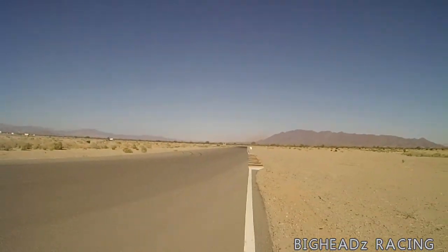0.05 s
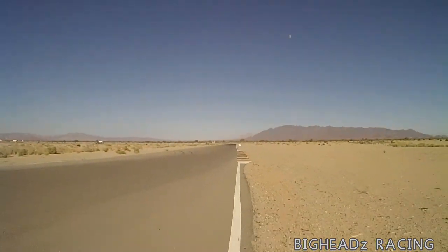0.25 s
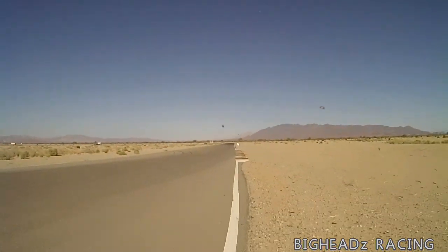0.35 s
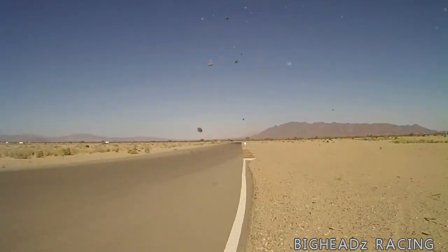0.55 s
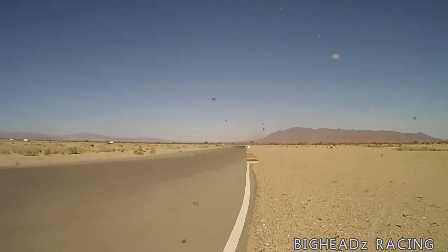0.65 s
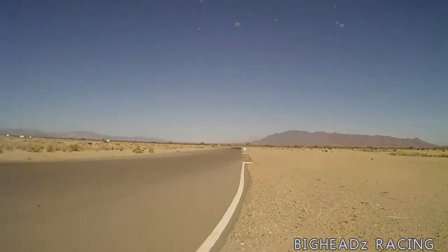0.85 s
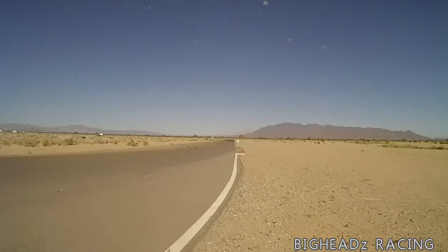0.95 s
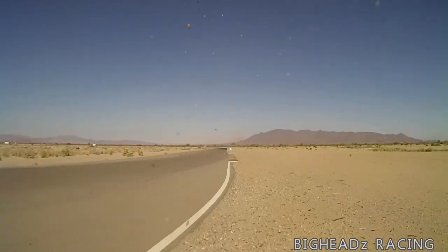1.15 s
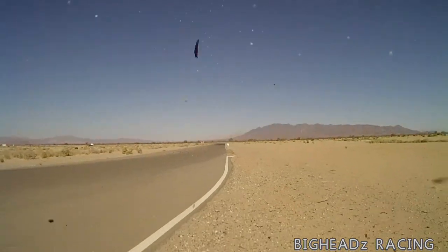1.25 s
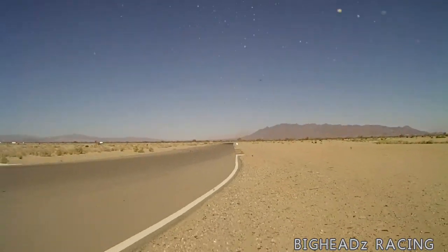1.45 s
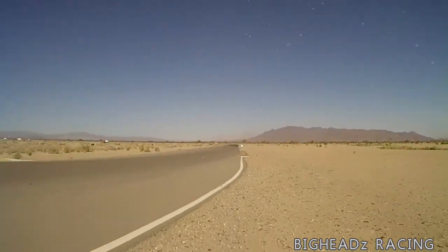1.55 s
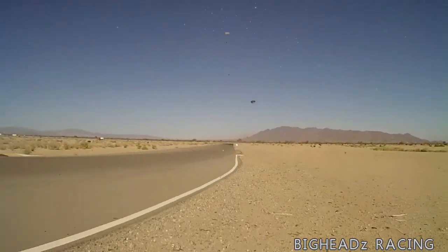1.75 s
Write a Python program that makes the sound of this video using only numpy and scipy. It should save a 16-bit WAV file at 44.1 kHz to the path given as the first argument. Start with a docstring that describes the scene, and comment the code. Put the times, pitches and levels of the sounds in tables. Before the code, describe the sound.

Gravel ticking and cracking against a moving car over wind and road rush.

```python
"""Gravel edge of a desert track, heard from a small camera case on the body of a moving car.
A tyre flings sprays of grit at the bodywork in quick, uneven bursts, about twenty a second.
Sand and pebbles tick on the case, which rings near 2.6 kHz; a few stones hit hard enough to overload.
Below lie wind, road rush, a faint engine and two dull road bumps."""
import sys
import numpy as np
from scipy import signal
from scipy.fft import rfft, irfft
from scipy.io import wavfile
from scipy.ndimage import uniform_filter1d

SR = 44100
rng = np.random.default_rng(int(sys.argv[2]) if len(sys.argv) > 2 else 0)


def wav_out(sig):
    """Save sig, one row per channel (or a flat mono array), as 16-bit PCM at SR to the path in sys.argv[1]."""
    wavfile.write(sys.argv[1], SR, np.round(np.clip(np.atleast_2d(sig).T, -1, 1) * 32767).astype(np.int16))


N = 79380
T = np.arange(N) / SR

# wind and road rush (frequency [Hz], gain [dB])
RUSH_COLOUR = [(20, 0), (80, 1), (150, 3), (300, -3), (550, -8), (1000, -7.5), (1750, -10), (2200, 1.5),
               (2420, -4), (2690, 1), (3000, -5), (4000, -14.5), (6200, -21.5), (7400, -26), (8400, -35),
               (10000, -46)]
# rush (time [s], level [dB])
RUSH_LEVELS = [(0, -34.5), (.45, -32), (.9, -31), (1.3, -31.3), (1.8, -34)]
# wind buffeting the case (frequency [Hz], gain [dB])
BUFFETING_COLOUR = [(5, -10), (13, 0), (32, -4), (60, -18), (150, -40), (2000, -100)]
# buffeting (time [s], level [dB])
BUFFETING_LEVELS = [(0, -35), (.12, -35), (.16, -31), (.22, -37), (.35, -38), (.55, -31), (.615, -21),
                    (.68, -38), (1.0, -35), (1.45, -36), (1.8, -41)]
# engine drone (frequency [Hz], start level [dB], end level [dB])
ENGINE_TONES = [(155, -56, -45.5), (208, -46, -49), (343, -51, -56), (785, -52, -57)]
# grit on the bodywork (time [s], relative level [dB], T60 [s], treble offset [dB])
GRIT_SPRAYS = [(.070, -31, .2, -3), (.127, -13.5, .095, -3), (.206, -16, .11, -2), (.278, -14.5, .1, -3),
               (.367, -15.5, .15, 0), (.411, -14, .11, 0), (.492, -12, .1, -2), (.508, -14, .13, 0),
               (.524, -17, .12, 0), (.557, -10.5, .135, -4), (.617, -21, .18, -1), (.664, -22, .13, 2),
               (.718, -20, .08, 0), (.727, -18, .16, 1), (.790, -12.5, .11, -1), (.851, -13, .13, -2),
               (.901, -15.5, .15, -2), (.957, -15, .11, -4), (.980, -24, .13, 0), (1.050, -16.5, .12, -4),
               (1.071, -17, .13, -1), (1.095, -6.5, .12, -5), (1.118, -19, .15, 1), (1.149, -16, .15, 0),
               (1.167, -11, .13, 0), (1.218, -8, .115, -2), (1.245, -18, .1, 2), (1.297, -20, .15, -1),
               (1.344, -17.5, .13, 0), (1.358, -20, .15, 0), (1.397, -22.5, .2, -1), (1.463, -18, .15, 0),
               (1.480, -19, .13, 0), (1.529, -18, .17, -2), (1.575, -28, .23, -1), (1.700, -21, .11, 2.5)]
# bodywork response (frequency [Hz], gain [dB])
BODY_COLOUR = [(150, -23), (350, -15), (600, -15), (1000, -6), (1250, -7), (1600, -3), (1820, -7),
               (2100, -1.5), (3200, -6), (3900, -13), (4300, -9.5), (4900, -16), (6200, -15.5), (7400, -18),
               (9500, -42), (14000, -43)]
# case resonances (frequency [Hz], bandwidth [Hz], gain [dB])
CASE_MODES = [(2220, 200, -9), (2540, 130, -.5), (2730, 110, .5), (3140, 200, -9.5)]
# sand on the case (time [s], relative level [dB])
SAND_LEVELS = [(0, -62), (.3, -54), (.38, -36), (.56, -37), (.66, -30), (.81, -30), (.9, -36), (1.2, -32.5),
               (1.5, -34.5), (1.72, -33)]
# crack of a hit (frequency [Hz], gain [dB])
CRACK_COLOUR = [(400, -26), (1500, -17), (3000, -4), (4200, -2), (4900, -5), (6100, 2), (6750, -4),
                (7450, 3.5), (8200, -11), (8700, -13), (10000, -30)]
# sparkle above the crack (frequency [Hz], gain [dB])
SPARKLE_COLOUR = [(6000, -30), (9800, -9), (11700, 2), (14600, 0), (17000, -14)]
# road bumps (time [s], level [dB], low edge [Hz], high edge [Hz])
ROAD_BUMPS = [(.160, -24, 25, 330), (.852, -28, 150, 260)]
# pebbles on the case, relative levels (time [s], crack [dB], ring [dB], sparkle [dB])
PEBBLE_HITS = [(0.195, -16, -21, -29), (0.2495, -24, -18, -35), (0.2535, -26, -19, -38),
               (0.3185, -39, -22, -66), (0.342, -13, -8, -28), (0.3455, -17, -8, -43),
               (0.3625, -32, -23, -55), (0.3693, -33, -19, -48), (0.372, -31, -24, -37),
               (0.376, -32, -11, -48), (0.3954, -40, -28, -42), (0.416, -27, -20, -43),
               (0.4645, -33, -28, -43), (0.4965, -25, -13, -40), (0.5125, -25, -10, -46),
               (0.533, -25, -23, -33), (0.552, -25, -15, -43), (0.6235, -28, -16, -64),
               (0.637, -29, -25, -35), (0.642, -26, -22, -36), (0.683, -27, -25, -44),
               (0.692, -22, -20, -43), (0.7345, -27, -20, -41), (0.749, -26, -19, -39),
               (0.7605, -38, -16, -59), (0.8138, -21, -30, -30), (0.8245, -39, -15, -37),
               (0.846, -28, -13.5, -52), (0.878, -33, -28, -44), (1.012, -25, -17.5, -40),
               (1.0705, -19, -18, -32), (1.086, -26, -24, -34), (1.149, -19, -15, -38),
               (1.165, -18, -19, -34), (1.176, -22, -10, -35), (1.187, -29, -26, -43),
               (1.2515, -19, -18, -28), (1.258, -12, -10, -26), (1.341, -28, -26, -41),
               (1.407, -26, -26, -44), (1.4355, -36, -34, -47), (1.462, -21, -20, -38),
               (1.484, -20, -17, -27), (1.538, -36, -19, -57), (1.5455, -34, -26, -43),
               (1.622, -23, -22, -42), (1.654, -31, -31, -48), (1.683, -30, -21, -49),
               (1.765, -35, -42, -49)]
# stones square on the case
# (time [s], ring pitch [Hz], ring [dB], ring T60 [s], crack peak [Hz], crack [dB], thud [dB])
STONE_HITS = [(.405, 2660, 0, .025, 5000, 3, -24), (.488, 2620, -3, .018, 7500, -5, -42),
              (.4922, 2590, 2, .012, 7600, -2, -40), (.5573, 2700, -3, .027, 7000, -10, -46),
              (1.0437, 2600, 8, .012, 5600, 5, -3), (1.0475, 2560, 6, .008, 7400, -3, -14),
              (1.095, 2480, -7, .02, 5700, -13, -40), (1.1, 2420, -5, .025, 6000, -18, -45)]

CASE_CENTRE_HZ, CRACK_PEAK_HZ = 2640, 7450
CRACK_T60_S, SPARKLE_T60_S = .015, .009


def from_db(db):
    """Decibels to gain."""
    return 10 ** (np.asarray(db) / 20)


def unit_rms(x):
    """Scale to unit rms."""
    return x / np.sqrt(np.mean(x ** 2) + 1e-20)


def gain_curve(points):
    """Gain through (time [s], level [dB]) points."""
    return from_db(np.interp(T, *np.transpose(points)))


def butter(x, hz, kind="low"):
    """Second-order Butterworth filter."""
    return signal.sosfilt(signal.butter(2, hz, kind, fs=SR, output="sos"), x)


def coloured(x, points, size=16384):
    """Minimum-phase filter through (frequency [Hz], gain [dB]) points, scaled to unit power gain."""
    hz, db = np.transpose(points)
    bins_hz = np.arange(size // 2 + 1) * SR / size
    log_gain = np.log(from_db(np.interp(np.log(bins_hz + 1), np.log(hz), db)))
    cepstrum = irfft(log_gain)[:size // 2]
    response = irfft(np.exp(rfft(2 * cepstrum, size)))
    return signal.fftconvolve(x, response / np.linalg.norm(response))[:len(x)]


def drift(cutoff_hz):
    """Random wander, unit rms."""
    return unit_rms(butter(rng.standard_normal(N + SR), cutoff_hz)[SR:])


def grains(per_s, spread_db):
    """Random contacts, most small, a few large."""
    sizes = from_db(spread_db * np.minimum(rng.exponential(1, N), 4)) * rng.choice([-1, 1], N)
    return unit_rms(sizes * (rng.random(N) < per_s / SR))


def contact(t60_s, strike=7, size=4096):
    """One sharp strike, then a dense, dying rattle."""
    rattle = rng.standard_normal(size) * from_db(-60 * T[:size] / t60_s)
    rattle[0] = strike
    return rattle


def add_hit(out, time_s, db, hit, window=132):
    """Mix in a hit with its loudest 3 ms at db."""
    start = int(time_s * SR)
    part = out[start:start + len(hit)]
    peak_rms = np.sqrt(uniform_filter1d(hit ** 2, window).max())
    part += from_db(db) * hit[:len(part)] / peak_rms


def wind():
    """Steady rush of air and road over slow buffeting."""
    rush = coloured(rng.standard_normal(N), RUSH_COLOUR)
    buffeting = unit_rms(coloured(rng.standard_normal(N), BUFFETING_COLOUR))
    return gain_curve(RUSH_LEVELS) * rush + gain_curve(BUFFETING_LEVELS) * buffeting


def engine(waver=.035, waver_hz=8, flutter_db=3.5, flutter_hz=9):
    """Tones waver together about a steady engine speed; each flutters in level."""
    warped_s = np.cumsum(1 + waver * drift(waver_hz)) / SR
    out = np.zeros(N)
    for hz, start_db, end_db in ENGINE_TONES:
        rms = from_db(np.linspace(start_db, end_db, N) + flutter_db * drift(flutter_hz))
        out += np.sqrt(2) * rms * np.sin(2 * np.pi * (hz * warped_s + rng.random()))
    return out


def spray_swells(attack_s=.006):
    """Each spray swells fast and thins out. Returns main and treble envelopes."""
    power, treble_power = 0, 0
    for time_s, db, t60_s, treble_db in GRIT_SPRAYS:
        age_s = T - time_s
        rise = np.clip(age_s / attack_s, 0, 1)
        swell = rise * from_db(db - 60 * np.maximum(age_s - attack_s, 0) / t60_s)
        power += swell ** 2
        treble_power += (swell * from_db(treble_db)) ** 2
    return np.sqrt(power), np.sqrt(treble_power)


def case_ring(force, pitch_ratio=1):
    """Case modes in parallel, alternating in sign, top dulled."""
    out = 0
    for k, (hz, width_hz, db) in enumerate(CASE_MODES):
        radius = np.exp(-np.pi * width_hz / SR)
        feedforward = np.array([1, 0, -1]) * (1 - radius ** 2) / 2
        feedback = [1, -2 * radius * np.cos(2 * np.pi * hz * pitch_ratio / SR), radius ** 2]
        out += (-1) ** k * from_db(db) * signal.lfilter(feedforward, feedback, force + 1e-18)
    return butter(out, hz=5000)


def sprays(swell, treble_swell, gain_db=-.2, case_db=1, treble_hz=3700, clump_hz=160, clump_db=3.2):
    """Dense grit patters on bodywork and case; it lands in clumps, so the treble crackles."""
    on_body = coloured(grains(per_s=8000, spread_db=3), BODY_COLOUR)
    on_case = unit_rms(case_ring(grains(per_s=8000, spread_db=3)))
    patter = unit_rms(on_body + from_db(case_db) * on_case)
    treble = signal.sosfiltfilt(signal.butter(3, treble_hz, "high", fs=SR, output="sos"), patter)
    clumps = unit_rms(from_db(clump_db * drift(clump_hz)))
    return from_db(gain_db) * ((patter - treble) * swell + treble * clumps * treble_swell)


def sand(swell, t60_s=.01, sparkle_db=-8, swell_exponent=.6):
    """Fine sand ticks on the case, a tiny rattle per grain; hardest during a spray."""
    impacts = grains(per_s=400, spread_db=3.6)
    power_decay = from_db(-60 / (t60_s * SR)) ** 2
    power = signal.lfilter([1], [1, -power_decay], impacts ** 2 + 1e-18)
    rattles = unit_rms(np.sqrt(power) * rng.standard_normal(N))
    ticks = coloured(rattles, CRACK_COLOUR) + from_db(sparkle_db) * coloured(rattles, SPARKLE_COLOUR)
    return swell ** swell_exponent * gain_curve(SAND_LEVELS) * ticks


def bumps():
    """Road bumps knock dully through the mount."""
    out = np.zeros(N)
    for time_s, db, low_hz, high_hz in ROAD_BUMPS:
        add_hit(out, time_s, db, butter(contact(t60_s=.07), [low_hz, high_hz], "band"))
    return out


def pebbles(crack_trim_db=2, ring_trim_db=-1.5, sparkle_trim_db=1.5, pitch_scatter=.018):
    """A pebble cracks, sparkles and rings the case; the pitch varies with where it lands."""
    out = np.zeros(N)
    for time_s, crack_db, ring_db, sparkle_db in PEBBLE_HITS:
        crack = coloured(contact(CRACK_T60_S), CRACK_COLOUR)
        ring = case_ring(contact(t60_s=.015), 1 + pitch_scatter * rng.standard_normal())
        sparkle = coloured(contact(SPARKLE_T60_S), SPARKLE_COLOUR)
        add_hit(out, time_s, crack_db + crack_trim_db, crack)
        add_hit(out, time_s, ring_db + ring_trim_db, ring)
        add_hit(out, time_s, sparkle_db + sparkle_trim_db, sparkle)
    return out


def stones(sparkle_below_crack_db=12):
    """A stone rings the case far harder and shakes it with a thud."""
    out = np.zeros(N)
    for time_s, ring_hz, ring_db, t60_s, crack_hz, crack_db, thud_db in STONE_HITS:
        ring = case_ring(contact(t60_s), ring_hz / CASE_CENTRE_HZ)
        shifted_colour = np.array(CRACK_COLOUR) * [crack_hz / CRACK_PEAK_HZ, 1]
        crack = coloured(contact(CRACK_T60_S), shifted_colour)
        sparkle = coloured(contact(SPARKLE_T60_S), SPARKLE_COLOUR)
        thud = butter(contact(t60_s=.022), hz=700)
        add_hit(out, time_s, ring_db, ring)
        add_hit(out, time_s, crack_db, crack)
        add_hit(out, time_s, crack_db - sparkle_below_crack_db, sparkle)
        add_hit(out, time_s, thud_db, thud)
    return out


def scene():
    """All sources at one microphone, same in both channels."""
    swell, treble_swell = spray_swells()
    gravel = sprays(swell, treble_swell) + sand(treble_swell) + pebbles() + stones()
    return np.tile(gravel + bumps() + wind() + engine(), (2, 1))


def record(dry):
    """The hardest hits clip flat; a steep low-pass cuts the top."""
    cutoff_hz = 15400
    lowpass = signal.ellip(10, .1, 80, cutoff_hz, fs=SR, output="sos")
    return signal.sosfilt(lowpass, np.clip(dry, -1, 1))


dry = scene()
out = record(dry)
wav_out(out)
```